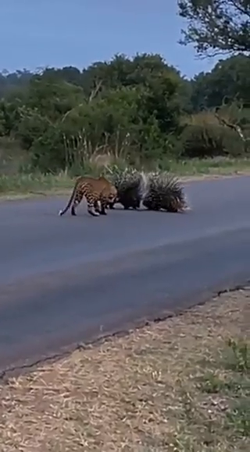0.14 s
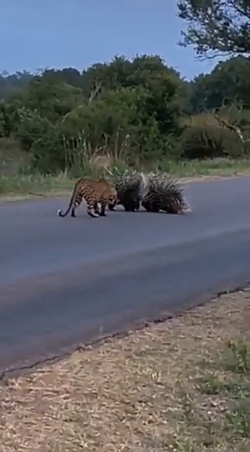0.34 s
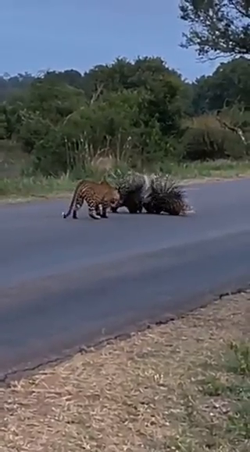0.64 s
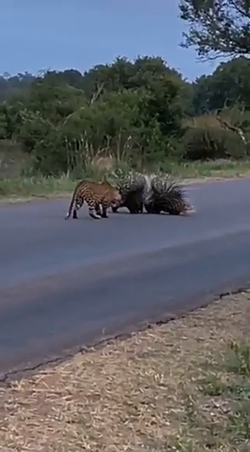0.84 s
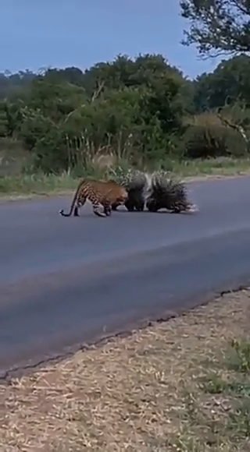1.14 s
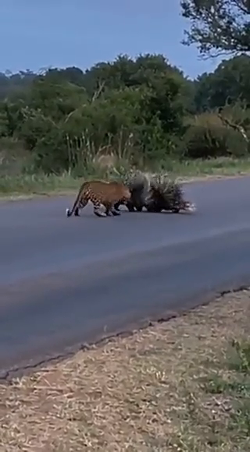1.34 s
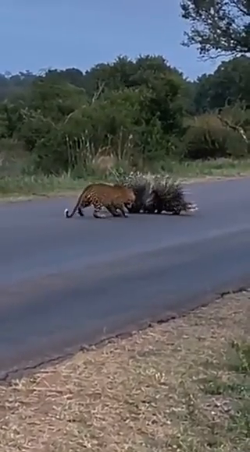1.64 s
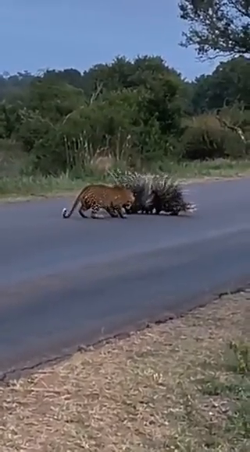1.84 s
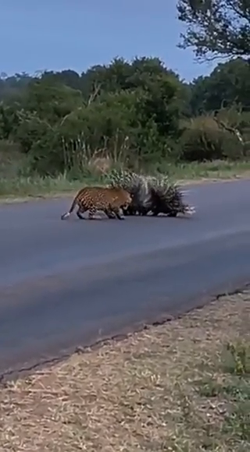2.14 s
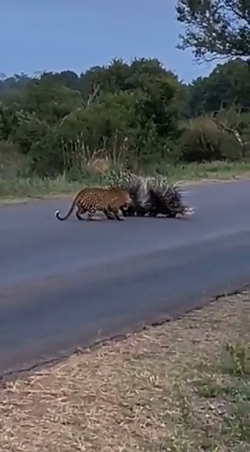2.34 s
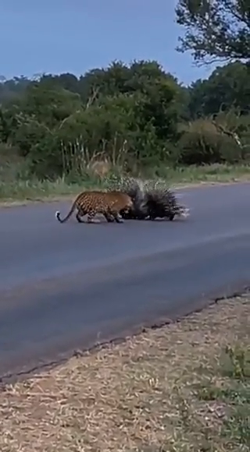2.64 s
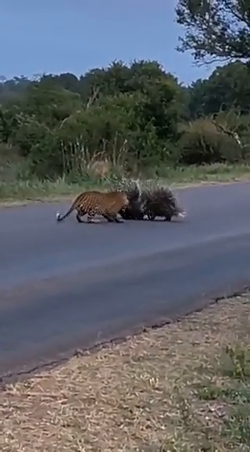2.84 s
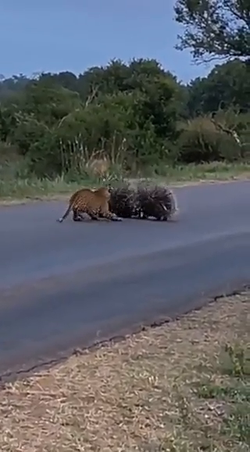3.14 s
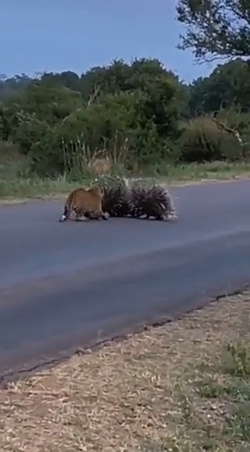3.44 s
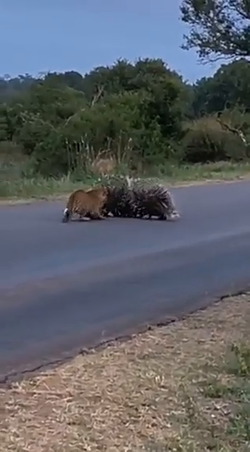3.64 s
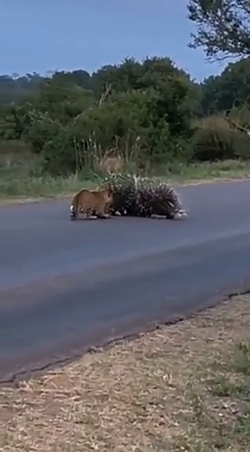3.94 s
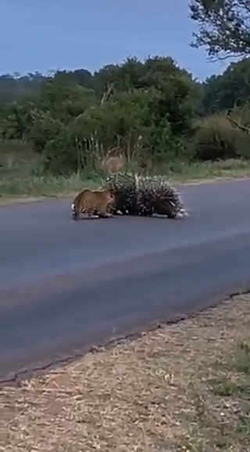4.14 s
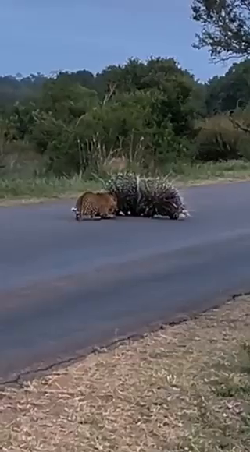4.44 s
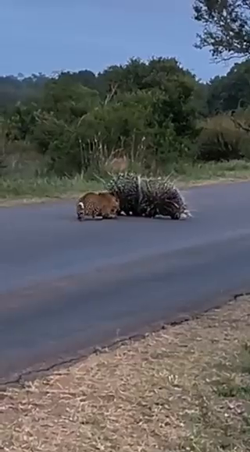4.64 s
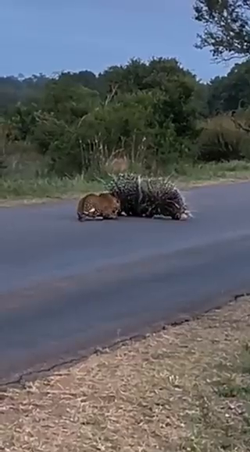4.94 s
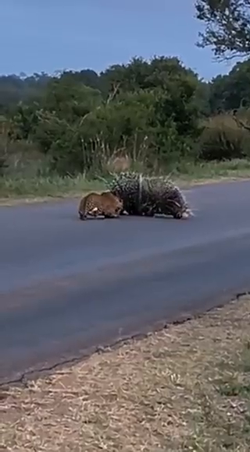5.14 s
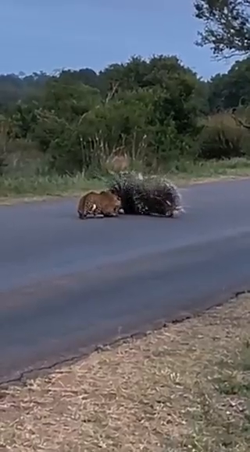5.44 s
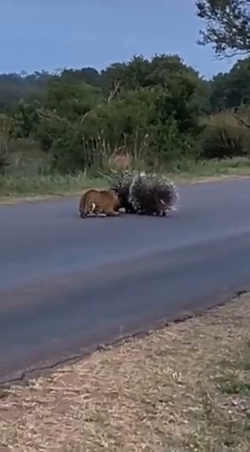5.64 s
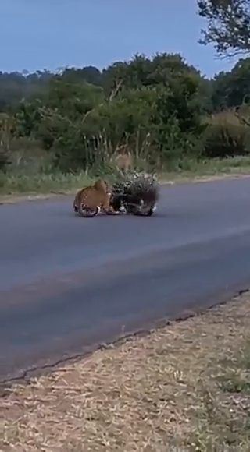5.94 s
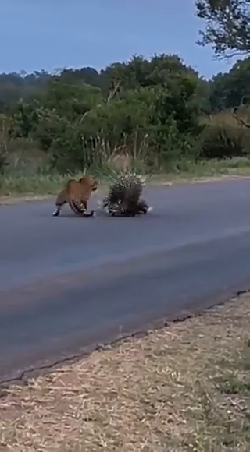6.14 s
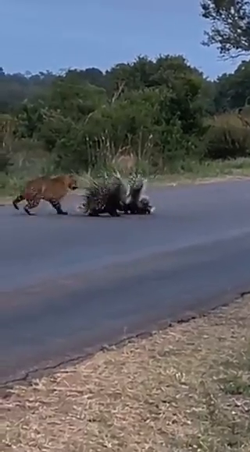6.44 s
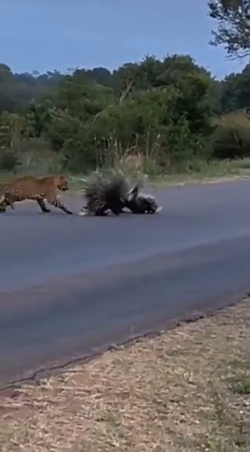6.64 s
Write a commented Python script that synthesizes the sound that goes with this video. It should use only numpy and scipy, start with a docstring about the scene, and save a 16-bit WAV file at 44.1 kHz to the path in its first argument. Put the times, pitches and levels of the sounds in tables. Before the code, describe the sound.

Short crackling spits and hisses come in irregular bursts, with dry hollow quill clatters between. Steady bird twitter runs through the first second or so, over a light breeze and grass crackle. Midway, throaty rasps, growls and dull blows pile up and end in a snarl. A quieter stretch has thin sliding whistles and scattered spits, then the loudest thuds and snarling near the end. Medium distance, brief boxy car-cabin colour, slight bush echo.

```python
"""A leopard harries two porcupines on a bush road: noise and ringing mouth air make its spits and hisses,
flapping noise its rasps, voice harmonics its snarls, pulses its growls and plain waves its deep hums.
Hollow quills ring when struck, over thuds made of two low waves. Gliding sine notes make the bird whistles
and twitter; narrow noise makes far calls. Filtered noise is the breeze, and clicks the dry grass.
The bushes echo, and the cabin of a stopped car colours all but the low sounds and the open air."""
import sys
import numpy as np
from scipy import signal
from scipy.fft import rfft, irfft
from scipy.io import wavfile
from scipy.ndimage import uniform_filter1d

SR = 44100
rng = np.random.default_rng(int(sys.argv[2]) if len(sys.argv) > 2 else 0)


def wrap_up_sound(samples):
    """Save the sound to the file named by the first command line argument, as 16-bit audio."""
    columns = np.atleast_2d(samples).T
    # keep every value between -1 and 1, then stretch to whole-number steps
    tamed = np.clip(columns, -1, 1)
    steps = np.round(tamed * 32767).astype(np.int16)
    wavfile.write(sys.argv[1], SR, steps)


N = 299880  # length in samples, 6.8 s
TIME = np.arange(N) / SR  # seconds
BINS = np.fft.rfftfreq(8192, 1 / SR)  # frequencies in Hz at which filters are drawn

# Levels in the tables are those before the final mix. Brightness: above 0 is brighter, below 0 duller.

# Light breeze colour. Each row: frequency in Hz, gain in dB.
BREEZE_COLOUR = [(20, 1), (45, -1), (110, 0), (250, -10.5), (600, -16), (950, -14.5), (1700, -22),
                 (3200, -22.5), (5000, -27), (6500, -34.5), (8500, -36.5), (10500, -49.5)]
# How long the bush echo lasts. Each row: frequency in Hz, time to fall by 60 dB in seconds.
ECHO_T60 = [(150, 0.087), (700, 0.62), (1800, 0.43), (4000, 0.28), (9000, 0.34)]
# What the bushes send back. Each row: frequency in Hz, gain in dB.
ECHO_COLOUR = [(150, 3.5), (900, -5.5), (1300, 3), (2100, -2.5), (2700, 0), (4500, -0.5), (9000, 1.5)]
# Peaks and notches of the car's cabin. Each row: frequency in Hz, gain in dB.
CABIN_PEAKS = [(345, 2), (500, -4), (635, 4), (755, -10), (850, 5), (1042, 5), (1125, -5), (1445, -3),
               (1500, 3), (1640, 3), (1740, 2), (1900, -3), (2045, 4), (2230, -3), (2342, 3), (3025, 3)]
# Reflections off the window frame and panels. Each row: delay in seconds, gain (1 is the direct sound).
PANELS = [(0, 1), (.001202, .16), (.001633, .2), (.002063, .12), (.002426, .12), (.005351, -.13),
          (.010272, .1)]

# Faint hoarse calls from the bush. Each row: start in seconds, length in seconds, level in dB, pitch in Hz.
FAR_CALLS = [(0.075, 0.062, -44, 1013), (0.209, 0.037, -38.5, 1770), (0.271, 0.026, -33.5, 1726),
             (2.059, .06, -43.5, 1228), (4.782, 0.15, -51.5, 3190)]
# Falling bird whistles. Each row: start in seconds, length in seconds, level at the end in dB,
# pitch at the start in Hz, pitch at the end in Hz.
WHISTLES = [(1.767, 0.047, -35.5, 5450, 4600), (1.822, 0.065, -39.5, 3560, 3180),
            (2.018, 0.075, -35, 6270, 4380), (2.096, 0.049, -37.5, 3550, 3205),
            (2.578, 0.06, -34, 5730, 4650), (2.701, 0.1, -40.5, 5700, 5090),
            (2.839, 0.072, -37, 6100, 4380), (3.783, 0.046, -25.5, 5630, 4500),
            (4.08, 0.13, -25.5, 7200, 4470), (4.368, 0.14, -26, 7300, 4540),
            (4.909, 0.041, -47.5, 4900, 4400), (5.924, 0.068, -40.5, 4020, 3540)]
# Runs of twitter. Each row: start in seconds, end in seconds, first gap from note to note in seconds,
# longest gap in seconds.
TWITTER_RUNS = [(.033, 1.3, .052, .0795), (4.697, 5.02, .056, .061)]
# Course of the twitter. Each row: time in seconds, pitch at the bottom of a note in Hz, level in dB.
TWITTER_COURSE = [(.03, 2937, -32.5), (.33, 2642, -28), (0.701, 2480, -24.5), (0.999, 2406, -22.5),
                  (1.27, 2347, -28), (4.7, 2450, -39), (5.0, 2384, -42)]

# Dull thuds of the scuffle. Each row: start in seconds, peak of the low wave's envelope in dB,
# peak of the upper wave's envelope in dB.
THUDS = [(.204, -28.5, -29), (1.868, -42, -32.5), (1.983, -30, -25), (2.02, -26, -31), (3.112, -20.5, -17),
         (3.227, -35, -13.5), (3.266, -43, -21), (3.384, -17, -17), (4.693, -22, -35.5),
         (5.027, -32, -28.5), (5.05, -15.5, -24.5), (5.109, -23, -40.5), (5.95, -22, -47),
         (5.978, -20, -14.5), (6.011, -12.5, -32), (6.114, -9, -24.5), (6.148, -6.5, -29),
         (6.539, -13, -23.5), (6.577, -10, -38), (6.667, -28, -23.5)]
# The two waves of a thud. Each row: middle pitch in Hz, time to the envelope's peak in seconds.
THUD_MODES = [(158, 0.0048), (332, 0.0087)]
# Clatters of the quills. Each row: start in seconds, length in seconds, level in dB, middle pitch in Hz.
QUILLS = [(0.439, 0.055, -23.5, 4400), (1.439, 0.066, -34.5, 2340), (1.738, 0.01, -23, 5870),
          (2.325, 0.016, -23, 5200), (2.518, 0.039, -34.5, 2780), (2.875, 0.019, -36.5, 2780),
          (3, 0.023, -19, 4780), (3.069, 0.059, -18.5, 4813), (3.233, 0.031, -24.5, 4900),
          (3.266, 0.064, -20.5, 4300), (3.334, 0.024, -26, 5160), (3.364, 0.088, -24.5, 4310),
          (3.725, 0.011, -24.5, 5750), (4.232, 0.046, -28, 4460), (5.814, 0.04, -27.5, 5630),
          (6.269, 0.034, -23, 5490), (6.351, 0.098, -23.5, 4920), (6.488, 0.01, -17, 6600),
          (6.529, 0.024, -20.5, 3780), (6.606, 0.052, -25.5, 5370)]
# Single hard clacks of quill on quill. Each row: start in seconds, level in dB.
CLACKS = [(0.466, -15), (1.343, -9), (3.041, -14), (3.147, -16), (3.161, -11), (3.194, -17), (3.303, -13),
          (3.458, -14), (5.851, -13), (6.209, -10.5), (6.356, -17), (4.593, -21)]
# Bright quill clacks near 5 kHz. Each row: start in seconds, length in seconds, level in dB, pitch in Hz.
BRIGHT_CLACKS = [(6.492, 0.035, -16, 5110), (6.702, 0.0053, -12, 4955)]
# Colour of the quills. Each row: frequency in Hz, gain in dB.
QUILL_COLOUR = [(800, -17), (1500, -0.5), (4500, -1), (7200, -5), (9000, -5), (10500, -29.5)]

# Deep hums. Each row: start in seconds, length in seconds, level in dB, middle pitch in Hz.
MOANS = [(1.112, 0.22, -32, 125.4), (3.291, 0.16, -33, 114.4)]
# Low growls. Each row: start in seconds, length in seconds, level in dB.
GROWLS = [(.8, 0.053, -30), (1.02, 0.46, -38.5), (2.04, 0.051, -32), (2.57, 0.11, -35.5), (3.1, 0.063, -24),
          (3.225, 0.22, -20.5), (3.47, 0.2, -32.5), (4.67, 0.099, -37), (4.99, 0.094, -35.5),
          (5.945, 0.15, -25.5), (6.115, 0.09, -21.5), (6.29, .2, -22), (6.53, 0.084, -24),
          (6.67, 0.12, -27)]
# Colour of the growls. Each row: frequency in Hz, gain in dB.
GROWL_COLOUR = [(40, -35), (75, -8.5), (115, 3), (180, 4.5), (260, -8.5), (380, -8.5), (520, -14.5),
                (1000, -68)]
# Short gruff huffs. Each row: start in seconds, length in seconds, level in dB.
HUFFS = [(2.567, 0.017, -17), (2.633, 0.011, -19), (2.695, 0.014, -24), (4.017, 0.034, -18),
         (5.482, 0.028, -24)]
# Colour of the huffs. Each row: frequency in Hz, gain in dB.
HUFF_COLOUR = [(50, -26.5), (200, -15.5), (500, -6), (750, -26), (1150, -1.5), (1850, -8), (2400, -17),
               (4000, -27), (10000, -59)]
# Unvoiced rasps. Each row: start in seconds, length in seconds, level in dB, brightness,
# middle of the throat resonance at the start in Hz, and at the end in Hz.
RASPS = [(0.798, 0.04, -29.5, -0.5, 1143, 1017), (0.943, 0.2, -27, -6.5, 967, 1097),
         (1.108, 0.17, -29.5, -2.5, 1152, 1039), (2.532, .05, -34.5, -7, 1201, 1121),
         (2.577, 0.1, -40.5, 6, 1150, 1305), (3.053, 0.047, -18.5, 10, 1770, 1580),
         (3.109, 0.027, -16, 9, 1600, 1795), (3.139, 0.027, -14.5, 5.5, 1500, 1703),
         (3.183, .022, -14, 13, 1072, 1525), (3.217, 0.034, -14, 6, 1660, 1350),
         (3.265, .062, -14, 1, 1880, 1540), (3.325, 0.12, -15, 2.5, 1650, 1457),
         (3.447, .11, -20, 3, 1486, 1447), (3.601, .055, -25, -3.5, 1052, 1001),
         (4.044, .11, -34.5, -1.5, 1850, 1980), (5.973, 0.041, -31, -8, 1367, 1390),
         (6.028, .09, -29, -8, 1330, 1368), (6.031, 0.089, -38, -5, 1930, 2030),
         (6.143, 0.062, -18, 4.5, 1433, 1913), (6.215, 0.039, -18, 7, 1900, 2014),
         (6.259, 0.013, -13, 1, 2080, 1985), (6.283, 0.071, -15, 0, 1850, 2066),
         (6.405, 0.066, -19, 0.5, 1485, 1970), (6.505, 0.089, -23.5, 1.5, 1900, 1507),
         (6.665, .1, -27, 4, 1900, 1788)]
# Colour of the rasps. Each row: frequency in Hz, gain in dB.
RASP_COLOUR = [(120, -11), (350, -18.5), (520, -4), (750, -13.5), (1000, 3.5), (1450, 0), (2100, 0.5),
               (3000, -8.5), (5000, -12), (7500, -16), (10500, -44.5)]
# Voiced snarls. Each row: start in seconds, length in seconds, level at the crest in dB, start and end in Hz
# of the pitch line that the voice touches only at its crest, brightness,
# throat resonance at the start in Hz, and at the end in Hz, roughness at the crest from 0 to 1.
SNARLS = [(0.699, .045, -13.5, 344.8, 329.3, 3.5, 1380, 1260, 0.3),
          (0.737, 0.042, -10.5, 344.6, 336, 0, 1050, 1000, 0.1),
          (3.487, 0.081, -14, 381, 372.3, -3, 2100, 1140, 0),
          (6.31, 0.05, -11.5, 425, 413, 1.5, 1400, 1060, .15),
          (6.352, .062, -12.5, 301, 279.6, 7.5, 1060, 826, 0.14),
          (6.427, 0.043, -18.5, 285.8, 304, -10, 900, 910, 0.37)]
# Colour of the voice. Each row: frequency in Hz, gain in dB.
VOICE_COLOUR = [(100, -50), (270, -3.5), (350, 3.5), (480, -8.5), (650, -8.5), (1050, 1), (1650, -4.5),
                (2200, -9.5), (3000, -51), (5000, -21.5), (10000, -47.5)]
# Hisses and spits. Each row: start in seconds, length in seconds, level halfway in dB,
# mouth resonance at the start in Hz, and at the end in Hz, brightness halfway, swell from start to end in dB.
HISSES = [(0.422, 0.072, -14, 2805, 2240, 4.5, 8), (0.626, 0.029, -17.5, 2650, 2360, -4.5, -3.5),
          (0.809, 0.03, -16, 2420, 2272, 2, 3.5), (1.113, 0.0069, -17.5, 2556, 2333, -8, 1.5),
          (1.299, 0.041, -15, 3050, 2830, 2.5, 9), (1.334, 0.056, -12.5, 2620, 2000, -1.5, 0),
          (1.51, 0.062, -21, 2735, 2300, -2, 4.5), (1.576, 0.019, -14.5, 2316, 2105, -3.5, -3),
          (1.618, 0.014, -18, 3340, 3010, 4, -4), (1.734, 0.045, -17.5, 2800, 2090, -4, -0.5),
          (2.15, 0.0055, -25.5, 2820, 2770, -4, -5), (2.207, 0.007, -24, 2750, 2680, -9, 1),
          (2.291, 0.014, -12, 2770, 2760, 8, 3), (2.328, 0.032, -13.5, 3100, 2743, -2.5, -6),
          (2.377, 0.069, -31, 2150, 2100, -15, -18), (2.569, 0.02, -22.5, 2800, 2730, -7, 0),
          (2.637, 0.015, -20.5, 2864, 2690, -10, -2), (2.692, 0.013, -26, 2410, 2070, -5.5, 5.5),
          (2.932, 0.013, -25, 2800, 2758, -5.5, 0), (3.007, 0.058, -21, 2810, 2660, 2, 9),
          (3.053, 0.056, -13, 3150, 2536, 2, 0.5), (3.256, 0.037, -12, 2650, 2640, 1, -11),
          (3.367, 0.036, -15.5, 2530, 2480, 8, -14), (3.45, 0.047, -13, 3300, 2520, -1, 2),
          (3.5, 0.05, -10, 2200, 1800, -5, -6), (3.726, 0.042, -13.5, 3540, 3160, -1, 1),
          (4.215, 0.085, -14.5, 3196, 1842, -3, 5), (4.434, 0.018, -18, 2660, 2500, -2, -1),
          (4.527, 0.0076, -20, 2770, 2450, -3, -10), (4.54, 0.031, -16.5, 3200, 2700, 12, -8.5),
          (4.592, 0.012, -16, 3350, 3140, 17, -19), (5.567, 0.052, -14.5, 2600, 2350, 2, 0.5),
          (5.608, 0.033, -12.5, 2615, 2195, 1.5, 3.5), (5.791, 0.022, -21, 2787, 2640, 1, 6),
          (5.814, 0.051, -17.5, 2640, 2290, -2.5, -6.5), (6.114, 0.062, -12, 3042, 2265, -1, -1.5),
          (6.304, 0.041, -18.5, 2555, 2840, 6, -1), (6.354, 0.042, -14, 2640, 2350, 2, -5),
          (6.585, 0.023, -15, 2767, 2580, -2, 9), (6.611, 0.062, -11.5, 2572, 1985, -3.5, -2.5),
          (6.779, 0.034, -19, 3090, 2850, -2, 5)]
# Colour of the hissing spray. Each row: frequency in Hz, gain in dB.
HISS_COLOUR = [(300, -14.5), (900, -21.5), (1100, -12.5), (1350, 3), (2500, 1), (3600, 3), (5200, -7),
               (7500, -16), (9000, -21.5), (10500, -35.5)]


def amp(db):
    """Decibels to gain."""
    return 10 ** (np.asarray(db) / 20)


def unit(x):
    """Scales to an average strength (rms) of 1."""
    return x / np.sqrt(np.mean(x ** 2) + 1e-20)


def read(points):
    """Reads a frequency table at every filter bin, joining its points on a log-frequency axis."""
    hz, value = np.transpose(points)
    return np.interp(np.log(BINS + 1), np.log(hz + 1), value)


def add(mix, s, sound):
    """Mixes a sound in at time s."""
    part = mix[max(round(s * SR), 0):][:len(sound)]
    part += sound[:len(part)]


def colour(x, db):
    """Filters by a gain in dB at each bin, without sounding ahead of time (minimum phase)."""
    log_gain = np.log(amp(np.r_[db, db[-2:0:-1]]))
    taps = np.fft.ifft(np.exp(np.conj(signal.hilbert(log_gain)))).real[:len(db)]
    return signal.fftconvolve(x, taps)[:len(x)]


def noise(size, points):
    """White noise coloured by a frequency table."""
    return colour(rng.standard_normal(size), read(points))


def wander(size, hz):
    """Smooth random curve of rms about 1; its movement fades out above about hz."""
    f = np.fft.rfftfreq(size + SR, 1 / SR)
    smooth = irfft(rfft(rng.standard_normal(size + SR)) * np.exp(-(f / hz) ** 2))
    return unit(smooth)[:size]


def cycles(hz):
    """Running count of cycles along a pitch curve."""
    return np.cumsum(hz) / SR


def tilt(x, brightness, pivot_hz=1300):
    """Raises or lowers the treble; the split lies near 1.4 times the pivot, the lift is 1.4 dB per step."""
    lowpass = signal.butter(2, pivot_hz * np.sqrt(2), fs=SR, output="sos")
    low = signal.sosfiltfilt(lowpass, x)
    return low + (x - low) * amp(brightness * np.sqrt(2))


def burst(length, attack_s=0.005, release_s=0.0048):
    """Time axis and envelope of a push of air that rises, is held, then dies."""
    t = np.arange(0, length + 6 * release_s, 1 / SR)
    return t, np.minimum(t / attack_s, 1) * np.exp(-np.maximum(t - length, 0) / release_s)


def bouts(rows, arch_db, attack_s, release_s):
    """Gain curve of several bouts, each bent by arch_db in its middle; overlaps add as energy."""
    energy = np.zeros(N)
    for s, length, db in rows:
        t, shape = burst(length, attack_s, release_s)
        arch = np.sin(np.pi * np.minimum(t / length, 1))
        add(energy, s, (shape * amp(db + arch_db * arch)) ** 2)
    return np.sqrt(energy)


def resonance(hz, width_hz):
    """Narrow ringing noise, as from air in a resonance, that follows the curve hz."""
    turn = 2 * np.pi * cycles(hz)
    return unit(wander(len(hz), width_hz) * np.cos(turn) + wander(len(hz), width_hz) * np.sin(turn))


def ticks(size, per_second, spread_db):
    """Random clicks of either sign, a few of them stronger than the rest."""
    strength = amp(spread_db * np.minimum(rng.exponential(1, size), 3)) * rng.choice([-1., 1.], size)
    return strength * (rng.random(size) < per_second / SR)


def ripple(size, depth_db, width):
    """Random peaks and dips about width bins wide, in dB."""
    bumps = np.convolve(rng.standard_normal(size), np.hanning(max(round(width), 3)), "same")
    return depth_db * unit(bumps)


def note(hz, rough, scatter, taper):
    """A near-sine note along a pitch curve; roughness shakes pitch and level."""
    turns = cycles(hz * (1 + scatter * rough * wander(len(hz), 390)))
    wave = np.sin(2 * np.pi * turns) * (1 + rough * wander(len(hz), 250))
    return unit(wave) * signal.windows.tukey(len(hz), taper)


def open_air(air_db=-43.0, band_db=-62, band_hz=7000, rustle_db=-57):
    """Patchy noise as a breeze, clicks as dry grass and a faint fitful narrow band at 7 kHz."""
    z = signal.stft(noise(N, BREEZE_COLOUR), nperseg=1024)[2]
    patches = uniform_filter1d(rng.standard_normal(z.shape), size=8, axis=0)  # smooth across pitch
    patches = unit(uniform_filter1d(patches, size=16, axis=1))  # and along time
    breeze = signal.istft(z * amp(2.8 * patches), nperseg=1024)[1][:N] * amp(1.5 * wander(N, 4))
    band = wander(N, 110) * np.sin(2 * np.pi * band_hz * TIME) * np.maximum(wander(N, 18), 0)
    crackle = ticks(N, per_second=160, spread_db=3.5) * np.maximum(wander(N, 2), 0)
    rustle = colour(crackle, read(HISS_COLOUR))
    return amp(air_db) * unit(breeze) + amp(rustle_db) * unit(rustle) + amp(band_db) * unit(band)


def bush_echo(x, gap_s=.012, count=3):
    """Sparse returns from the bushes, each band dying at its own speed; three sets of paths take turns."""
    out = np.zeros(N)
    for path in range(count):
        taps = (rng.random(SR) < 2500 / SR) * rng.choice([-1., 1.], SR) * (TIME[:SR] > gap_s)
        hz, t, z = signal.stft(taps, SR, nperseg=256)
        t60 = np.interp(hz, BINS, read(ECHO_T60))[:, None]
        tail = signal.istft(z * amp(-60 * t / t60), SR, nperseg=256)[1]
        # the feed to each set goes round once a second, so the echo's colour keeps changing
        share = np.sqrt(2 / count) * np.cos(np.pi * (2 * TIME + path / count))
        out += signal.fftconvolve(x * share, tail / np.linalg.norm(tail))[:N]
    return out


def cabin(x, ring_db=-9, t60=0.023):
    """A few hard reflections close by, and the brief ring of the cabin as dense, dying echoes."""
    t = TIME[:SR // 6]
    taps = (rng.random(len(t)) < 1500 / SR) * rng.choice([-1., 1.], len(t))
    taps = taps * (t > .004) * amp(-60 * t / t60)
    taps *= amp(ring_db) / np.linalg.norm(taps)
    for delay, gain in PANELS:
        taps[round(delay * SR)] += gain
    return signal.fftconvolve(x, taps / np.linalg.norm(taps))[:N]


def far_calls(width_hz=150):
    """Short hoarse notes, each a narrow band of ringing noise."""
    out = np.zeros(N)
    for s, length, db, hz in FAR_CALLS:
        t, shape = burst(length)
        add(out, s, amp(db) * shape * resonance(np.full(len(t), hz), width_hz))
    return out


def whistles(bend=1.9, rough=0.17, swell_db_per_oct=17, flicker_db=2.5):
    """Thin bird notes tip over and slide down, growing louder and flickering as they fall."""
    out = np.zeros(N)
    for s, length, db, start_hz, end_hz in WHISTLES:
        fall = np.sin(np.pi / 2 * np.linspace(0, 1, round(length * SR)) ** bend)
        hz = start_hz + (end_hz - start_hz) * fall
        level = amp(db - swell_db_per_oct * np.log2(hz / end_hz))
        add(out, s, level * note(hz, rough, scatter=0.065, taper=0.28))
    return out * unit(amp(flicker_db * wander(N, 45)))


def twitter(blur_width_hz=450, blur_release_s=.006, blur_gain=1.1):
    """Runs of dipping notes that slow to a steady pace, clear and sink; rough ones trail a hoarse blur."""
    note_share, turn_s, dip = 0.36, 0.0154, 0.157  # share of the gap filled, time of the bottom, bend
    first_rough, clearing_per_s, slowing = 0.45, 6.6, 1.062  # notes clear as the gaps widen
    out = np.zeros(N)
    times, pitches, levels = np.transpose(TWITTER_COURSE)
    for s, end, first, longest in TWITTER_RUNS:
        gap = first
        while s < end:
            length = note_share * gap
            level = amp(np.interp(s, times, levels))
            t = np.arange(0, length, 1 / SR)
            hz = np.interp(s, times, pitches) * (1 + dip * (t / turn_s - 1) ** 2)
            rough = max(first_rough - clearing_per_s * (gap - first), 0)
            add(out, s, level * note(hz, rough, scatter=.06, taper=0.1))
            t, shape = burst(length, length, blur_release_s)
            blur = resonance(np.full(len(t), hz.mean()), blur_width_hz)
            add(out, s, level * blur_gain * rough * shape * blur)
            s, gap = s + gap, min(gap * slowing, longest)
    return out


def thuds(waver=0.088):
    """Dull blows: two low, wavering waves swell and die within a few cycles."""
    out, t = np.zeros(N), np.arange(SR // 8) / SR
    for s, *peaks_db in THUDS:
        for db, (hz, rise_s) in zip(peaks_db, THUD_MODES):
            swell = t / rise_s * np.exp(1 - t / rise_s)
            wave = np.sin(2 * np.pi * cycles(hz * (1 + waver * wander(len(t), 78))))
            add(out, s, amp(db) * swell * wave)
    return out


def quills(level_db=-1, per_second=340, spread_db=2.0, scatter_oct=.3, release_s=.013, ring_t60=.022):
    """Clatters of hollow quills: each knock rings briefly at two pitches scattered about the clatter's own."""
    out, ring_t = np.zeros(N), TIME[:SR // 30]
    for s, length, db, centre_hz in QUILLS:
        t, shape = burst(length, attack_s=0.18 * length, release_s=release_s)
        knocks, clatter = ticks(len(t), per_second, spread_db), np.zeros(len(t))
        for at in np.flatnonzero(knocks):
            hz = centre_hz * 2 ** (scatter_oct * rng.standard_normal((2, 1)))
            ring = np.sin(2 * np.pi * hz * ring_t).sum(0) * amp(-60 * ring_t / ring_t60)
            add(clatter, at / SR, knocks[at] * ring)
        add(out, s, amp(db) * shape * unit(clatter))
    return amp(level_db) * colour(out, read(QUILL_COLOUR))


def clacks(centre_hz=4000, scatter_oct=.55, t60=0.043, attack_s=0.0018):
    """Bunches of 16 quills strike at once, each quill ringing at its own pitch."""
    out, t = np.zeros(N), TIME[:SR // 20]
    for s, db in CLACKS:
        hz = centre_hz * 2 ** (scatter_oct * rng.standard_normal((16, 1)))
        rings = unit(np.sin(2 * np.pi * (hz * t + rng.random(hz.shape))).sum(0))
        add(out, s, rings * np.minimum(t / attack_s, 1) * amp(db - 60 * t / t60))
    return colour(out, read(QUILL_COLOUR))


def bright_clacks(width_hz=170, puff_db=-4):
    """Bright quill clacks near 5 kHz: narrow ringing noise in a puff of hiss."""
    out = np.zeros(N)
    for s, length, db, hz in BRIGHT_CLACKS:
        t, shape = burst(length)
        ring = resonance(np.full(len(t), hz), width_hz)
        puff = amp(puff_db) * unit(noise(len(t), HISS_COLOUR))
        add(out, s, amp(db) * shape * (ring + puff))
    return out


def moans():
    """Deep, slightly rough hums on a nearly level pitch."""
    out = np.zeros(N)
    for s, length, db, hz in MOANS:
        pitch = np.full(round(length * SR), hz)
        add(out, s, amp(db) * note(pitch, rough=.22, scatter=0.29, taper=0.51))
    return out


def growl(level_db=-1, pulse_hz=42, uneven_db=2, air=1.0):
    """Slow uneven pulses, mixed with breath noise, boom in the chest."""
    pulse_count = np.floor(cycles(pulse_hz * np.exp(.3 * wander(N, 41.15))))
    pulses = np.diff(pulse_count, prepend=0) * amp(uneven_db * wander(N, 60))
    drive = unit(pulses) + air * rng.standard_normal(N)
    gain = bouts(GROWLS, arch_db=-1.0, attack_s=0.0054, release_s=0.03)
    return amp(level_db) * gain * unit(colour(drive, read(GROWL_COLOUR)))


def huffs(attack_s=0.03, release_s=0.0097):
    """Short pushes of air through the open throat."""
    out = np.zeros(N)
    for s, length, db in HUFFS:
        t, shape = burst(length, attack_s, release_s)
        add(out, s, amp(db) * shape * unit(noise(len(t), HUFF_COLOUR)))
    return out


def rasp(flap_hz=44, flap_db=3.2, lump_db=0.5, throat_width_hz=150, throat_db=1.2, restless=0.0896):
    """Surges of throaty hiss chopped by uneven flaps; each swells in with a gliding, restless resonance."""
    out = np.zeros(N)
    for s, length, db, brightness, start_hz, end_hz in RASPS:
        t, shape = burst(length, attack_s=0.15 * length, release_s=.009)
        hz = np.interp(t, [0, length], [start_hz, end_hz]) * (1 + restless * wander(len(t), 39.2))
        air = unit(tilt(noise(len(t), RASP_COLOUR), brightness))
        throat = amp(throat_db) * resonance(hz, throat_width_hz)
        add(out, s, amp(db) * shape * unit(air + throat))
    flaps = np.cos(2 * np.pi * cycles(flap_hz * (1 + 0.341 * wander(N, 52.5))))
    return out * unit(amp(flap_db * flaps + lump_db * wander(N, 31)))


def snarls(flap_hz=105, crest_skew=0.838, throat_db=8, throat_width_hz=220):
    """Unsteady vocal folds and puffs of air throb with slack tissue and sound through a gliding throat."""
    arch_db, arch_pitch = 1.5, 0.0845  # level and pitch arch together
    rough_ends, jitter, throb, lump_db = .38, .036, .22, 1.5
    out = np.zeros(N)
    for s, length, top_db, start_hz, end_hz, brightness, throat_start, throat_end, rough_top in SNARLS:
        t = np.arange(0, length, 1 / SR)
        slack = 1 - np.sin(np.pi * (t / length) ** crest_skew)  # 0 at the crest, 1 at the ends
        db = top_db - arch_db * slack
        hz = np.linspace(start_hz, end_hz, len(t)) * (1 - arch_pitch * slack)
        rough = rough_top + (rough_ends - rough_top) * slack  # the voice is clearest at its crest
        turns = cycles(hz * (1 + jitter * wander(len(t), 160)))
        k = np.arange(1, 16)[:, None]  # harmonic numbers
        throat_hz = np.linspace(throat_start, throat_end, len(t))
        lift = amp(throat_db * np.exp(-((k * hz - throat_hz) / throat_width_hz) ** 2))
        # random phases: slack folds smear each pulse
        folds = (lift * np.cos(2 * np.pi * (k * turns + rng.random(k.shape)))).sum(0)
        puffs = (0.87 + np.exp(-(turns % 1) / 1.2)) * rng.standard_normal(len(t))
        drive = np.sqrt(1 - rough) * unit(folds) + 2 * np.sqrt(rough) * unit(puffs)
        drive *= 1 + throb * np.sin(2 * np.pi * flap_hz * t)
        voice = unit(tilt(colour(drive, read(VOICE_COLOUR)), brightness))
        level = amp(db + lump_db * wander(len(t), 80))
        add(out, s, level * voice * signal.windows.tukey(len(t), .3))
    return out


def hisses(width_hz=190, release_s=0.017, crackle=0.89, crackle_per_s=700, flutter_db=1.8):
    """Air and crackling spittle rush past the teeth; the mouth rings, and the spray dulls as the jaw closes."""
    whistle_share, whistle_hz, share_per_oct = 0.37, 3030, 0.48  # a narrower, lower mouth whistles more
    spray_follows = 0.046  # how far the spray's colour follows the mouth resonance
    jaw_dulling = 2.5  # brightness lost from start to end
    out = np.zeros(N)
    for s, length, db, start_hz, end_hz, brightness, swell_db in HISSES:
        t, shape = burst(length, attack_s=min(.012, length / 2), release_s=release_s)
        progress = np.minimum(t / length, 1)
        share = np.clip(whistle_share - share_per_oct * np.log2(start_hz / whistle_hz), .1, .7)
        mouth = resonance(start_hz + (end_hz - start_hz) * progress ** 1.5, width_hz)
        # random peaks and dips give each hiss a slightly tonal grain
        grain_db = ripple(len(BINS), depth_db=4.2, width=70)
        spray_db = read(np.array(HISS_COLOUR) * [(start_hz / whistle_hz) ** spray_follows, 1])
        spittle = crackle * unit(ticks(len(t), crackle_per_s, spread_db=3))
        spray = colour(rng.standard_normal(len(t)) + spittle, spray_db + grain_db)
        spray = unit(tilt(spray, brightness + jaw_dulling * (.5 - progress), pivot_hz=1890))
        air = np.sqrt(share) * mouth + np.sqrt(1 - share) * spray
        add(out, s, air * shape * amp(db + swell_db * (progress - .5)))
    return out * unit(amp(flutter_db * wander(N, 88)))


def scene(peak_width_hz=34):
    """The fight, the birds, their echoes and the open air."""
    cabin_db = sum(db * np.exp(-((BINS - hz) / peak_width_hz) ** 2) for hz, db in CABIN_PEAKS)
    close = amp(-2.5) * hisses() + amp(-2.5) * bright_clacks() + amp(-1.0) * snarls() + rasp() + huffs()
    fight = colour(close, cabin_db) + quills() + clacks()
    low = growl() + thuds() + moans()
    calls, slurs = twitter() + far_calls(), whistles()
    to_bushes = amp(-10) * colour(fight, read(ECHO_COLOUR)) + amp(-17.5) * low
    to_bushes += amp(-10.5) * calls + amp(-11.5) * slurs
    inside = cabin(fight + calls + slurs + bush_echo(to_bushes))
    return (inside + low + open_air())[None]


def record(dry):
    """Soft overload on the loudest peaks, then a steep cut of the treble."""
    limited = dry / (1 + (dry / .92) ** 4) ** (1 / 4)
    lowpass = signal.firwin(401, 10650, window=("kaiser", 9), fs=SR)  # edge in Hz
    return signal.oaconvolve(limited, lowpass[None], "same")


dry = scene()
out = record(dry)
wrap_up_sound(out)
```